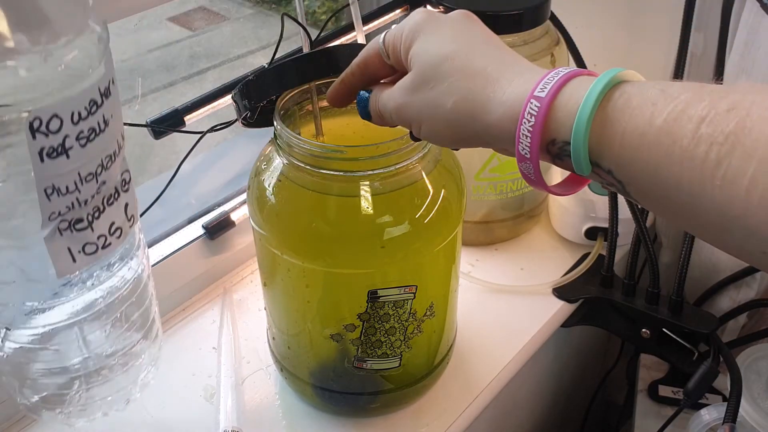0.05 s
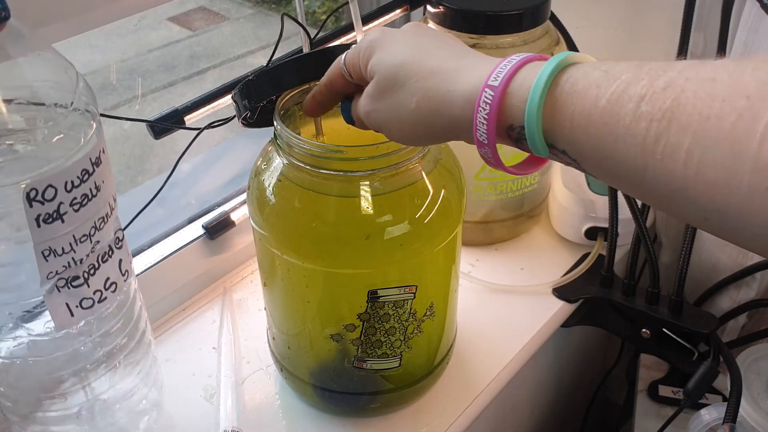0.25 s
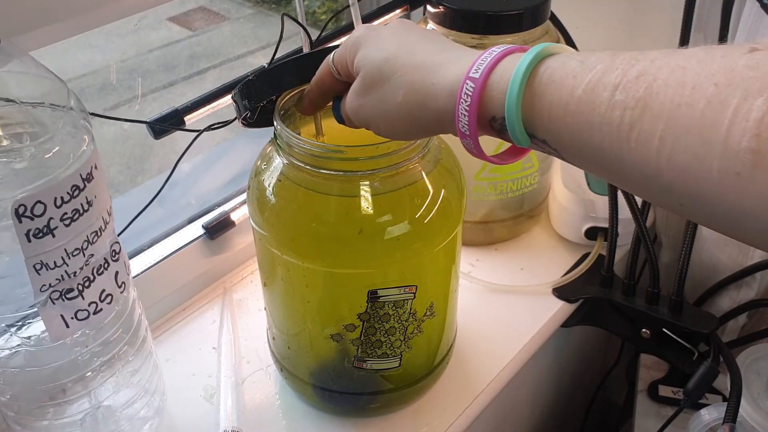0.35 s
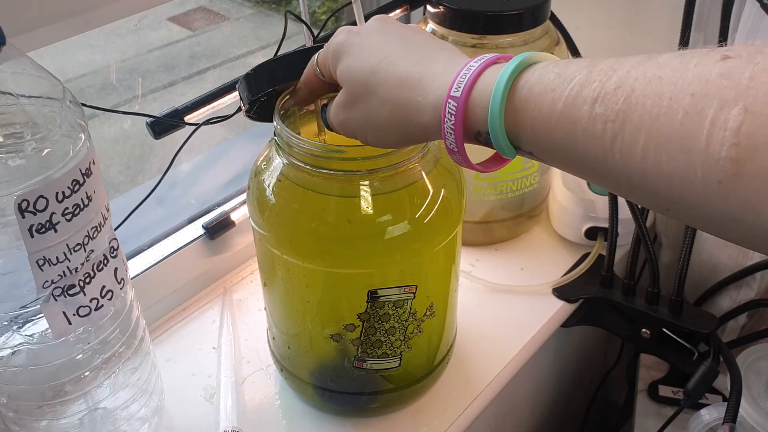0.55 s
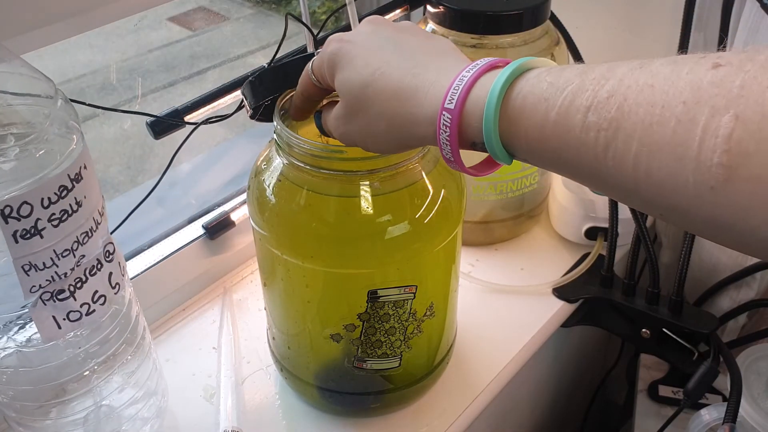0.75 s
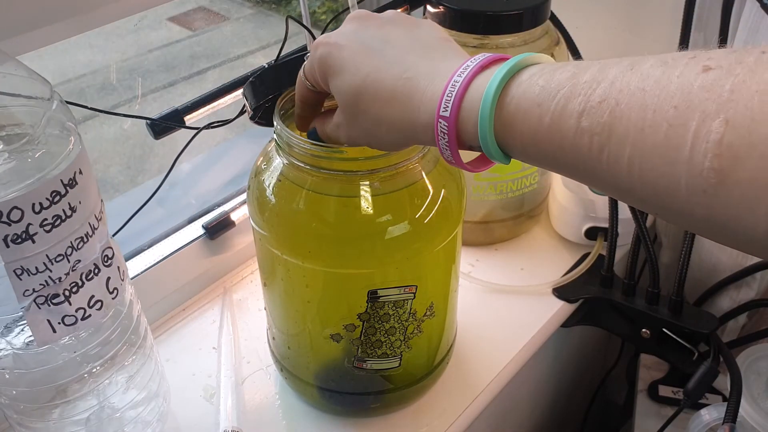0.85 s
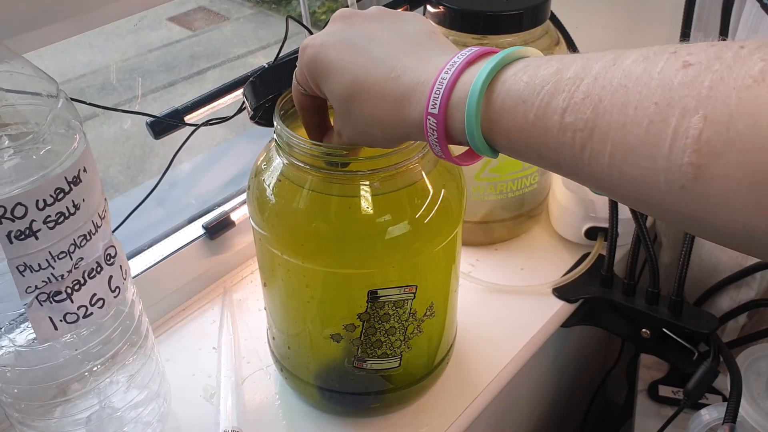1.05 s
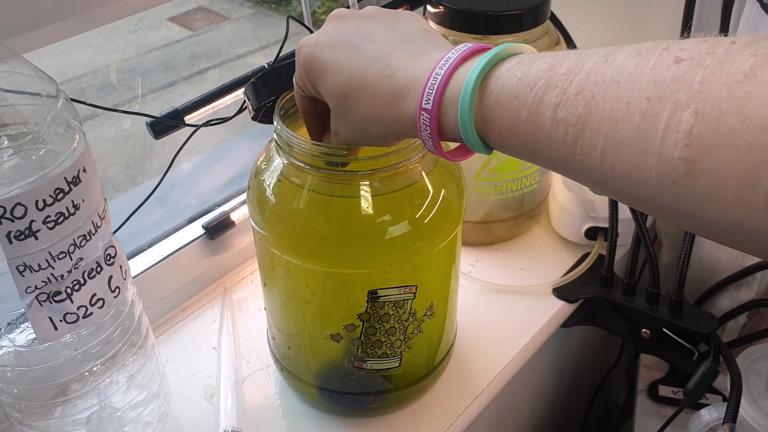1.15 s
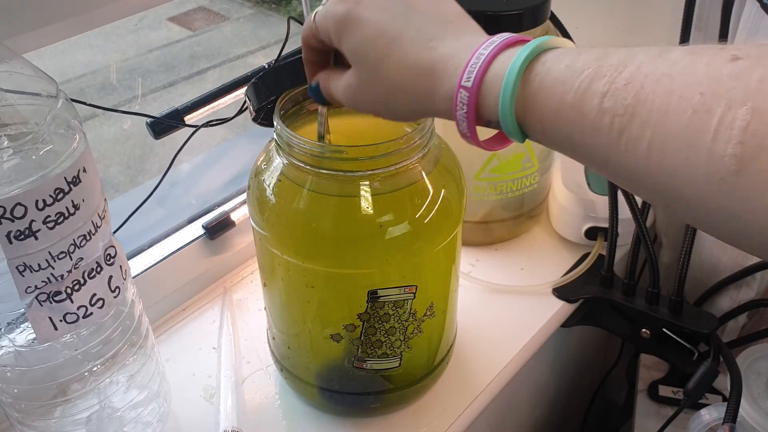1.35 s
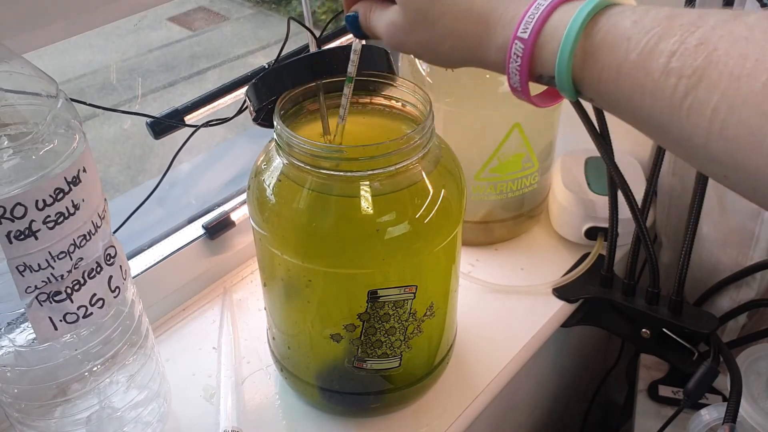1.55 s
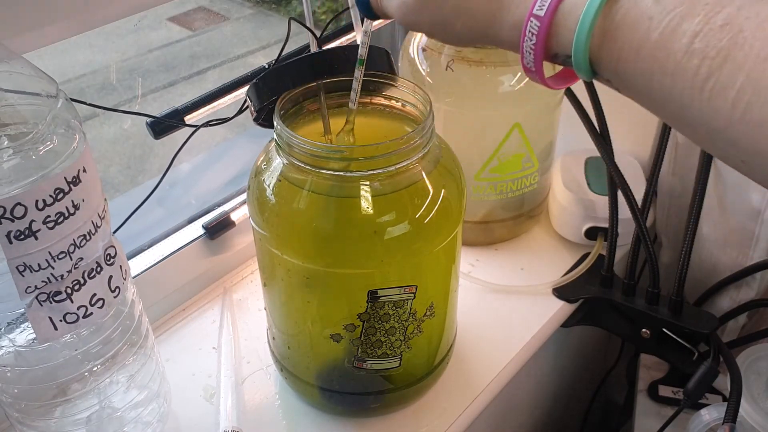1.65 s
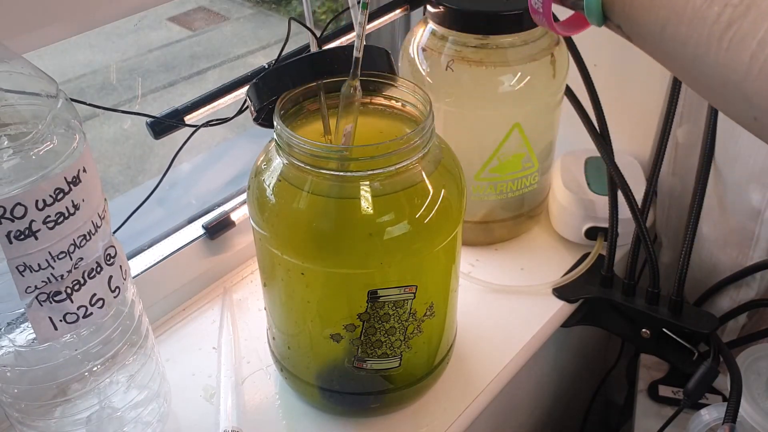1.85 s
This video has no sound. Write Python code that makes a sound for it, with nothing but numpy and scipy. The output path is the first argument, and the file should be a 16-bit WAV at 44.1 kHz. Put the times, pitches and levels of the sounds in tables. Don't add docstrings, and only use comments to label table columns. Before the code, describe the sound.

An empty plastic bottle crackles in the hand and knocks hollowly twice onto a window sill.

```python
import sys
import numpy as np
from scipy import signal
from scipy.fft import rfft, irfft
from scipy.io import wavfile

SR = 44100
rng = np.random.default_rng(int(sys.argv[2]) if len(sys.argv) > 2 else 0)


def ratio_of_db(decibels):
    return 10 ** (np.asarray(decibels, float) / 20)


def dump(signal):
    limited = np.clip(np.atleast_2d(signal).T, -1, 1)
    pcm = np.round(limited * 32767).astype(np.int16)
    wavfile.write(sys.argv[1], SR, pcm)


N = 83790


def level(x, db):
    return x * ratio_of_db(db) / np.sqrt(np.mean(x ** 2))


def curve(rows):
    return ratio_of_db(np.interp(np.arange(N) / SR, *np.array(rows).T[:2]))


def band(x, hz, width_hz):
    hz = min(hz, SR / 2.3)
    return signal.lfilter(*signal.iirpeak(hz, hz / min(width_hz, SR / 4), fs=SR), x)


def butter(x, order, hz, kind):
    return signal.sosfilt(signal.butter(order, hz, kind, fs=SR, output="sos"), x)


def fade(t60, count):
    return np.exp(-np.log(1000) * np.arange(count) / SR / t60)


def add(out, s, x):
    i = int(s * SR)
    out[i:i + len(x)] += x[:N - i]


def snaps(rows, wall, turns, tilt_db):
    out = np.zeros(N)
    for s, db, hz, t60, treble_db in rows:
        a, b, c = rng.standard_normal((3, 8192))
        grit = ratio_of_db(1.5 * np.repeat(c[:256], 32)) + ratio_of_db(1) * fade(0.005, 8192)
        burst = grit * fade(t60, 8192)
        ring = band(band(a * burst, hz, hz / turns), hz, 3.3 * hz)
        spray = np.zeros(8192)
        for (f, width, peak_db), chance in zip(wall, c[300:]):
            gain = ratio_of_db(peak_db + 1.5 * chance + tilt_db * np.log2(f)) / np.sqrt(width)
            spray += gain * band(band(b * burst, f, width), f, 3 * width)
        ring = ring / np.abs(ring).max()
        spray = spray / np.abs(spray).max()
        add(out, s, ratio_of_db(db) * (ring + ratio_of_db(treble_db) * spray))
    return out


def strike(modes, db, contact_ms, high_db=0., low_db=0.):
    t = np.arange(16384) / SR
    hz, mode_db, t60 = np.array(modes).T
    gain_chance, pitch_chance = rng.standard_normal((2, len(hz)))
    gain = ratio_of_db(mode_db + np.where(hz > 200, high_db, low_db) + 2.1 * gain_chance)
    gain = gain * (-1) ** np.arange(len(hz))
    lead = np.where(hz > 200, 0, np.pi / 2)[:, None]
    phase = 2 * np.pi * np.outer(hz * (1 + 0.0098 * pitch_chance), t) + lead
    bloom_ms = 1.8
    bloom = 1 - np.outer(np.where(hz > 300, .2, .9), np.exp(-t * 1000 / bloom_ms))
    ring = gain @ (np.sin(phase) * np.exp(-np.log(1000) * t / t60[:, None]) * bloom)
    push = t[:400] * np.exp(-t[:400] * 5000 / contact_ms)
    return ratio_of_db(db) * np.convolve(ring, push / push.sum())


def strikes(modes, rows):
    out = np.zeros(N)
    for s, *blow in rows:
        add(out, s, strike(modes, *blow))
    return out


def bottle_crackles():
    # start in seconds, level in dB, centre in Hz, t60 in seconds, treble in dB.
    crackles = [(.004, -35.5, 1320, 0.036, -14), (.013, -52, 2200, 0.58, -9.5), (.057, -46, 1230, 0.09, -9),
                (.0648, -33.5, 1460, 0.049, -6), (.072, -43.5, 2200, 0.044, -5),
                (.100, -52, 1170, 0.2, 1.5), (.1331, -41, 1240, 0.098, -7.5), (.1471, -44, 1150, 0.12, 2.5),
                (.188, -41, 1400, 0.24, -6.5), (.2106, -32, 1410, 0.04, -5),
                (.2110, -31.5, 2560, 0.022, -9), (.226, -31, 1150, 0.038, -8),
                (.2295, -45, 950, 0.063, 6.5), (.2593, -44, 4100, 0.11, 2), (.284, -34.5, 1120, 0.15, -6.5),
                (.3206, -32.5, 1410, 0.068, -7.5), (.345, -52.5, 1100, 0.39, -2.5),
                (.365, -52, 2270, 0.2, -2.5), (.40, -63.5, 2200, 0.22, 1), (.448, -59, 1150, 0.21, -3.5),
                (.618, -64, 1480, 0.088, -38), (.653, -57.5, 1850, 0.06, -34), (.779, -54, 2300, 0.18, 1),
                (.7861, -49.5, 2160, 0.057, 5), (.826, -69, 2330, 0.47, 11.5), (.8725, -48, 3500, 0.04, 11),
                (.9547, -56.5, 2500, 0.066, 4.5), (1.6157, -60.5, 2200, 0.16, -3.5)]
    # frequency in Hz, width in Hz, level in dB.
    wall_peaks = [(2310, 410, 1), (3500, 260, 2), (4800, 1420, 7), (6230, 2000, 6.5), (6500, 2200, -6.5),
                  (7500, 2000, -10.5), (9260, 2000, -4.5), (10530, 2300, 0.5), (13700, 1600, -11)]
    return snaps(crackles, wall_peaks, turns=2.6, tilt_db=-2.0)


def bottle_knocks():
    # frequency in Hz, level in dB, t60 in seconds.
    body = [(96, -3.5, 0.19), (130, -12.5, 0.14), (153.2, -12.5, 0.15), (267, -3.5, 0.19),
            (460, -22, 0.048), (602.5, -16, 0.15), (683, -12.5, 0.075), (936, -11, 0.039),
            (1150, -17.5, 0.1), (1410, -15, 0.06), (1544, -15, 0.09), (392, -11, 0.035)]
    # start in seconds, level in dB, contact in ms, upper modes in dB, lowest modes in dB.
    knocks = [
        (.2250, -22, 0.5, -4.5, 3),
        (.3200, -19, 1.17, 1, 4),
        (.432, -42, 3.6, 6, -18),
        (0.7866, -37, 0.68, 2, -33),
        (.806, -37.5, 5.1, 9.5, 6),
        (0.8719, -43.5, 0.23, -1, 2),
        (0.891, -53, 8.7, -6, 11.5),
        (0.9557, -47, 0.82, -3.5, 3),
        (1.015, -55, 1.8, -2.5, 8),
    ]
    return strikes(body, knocks)


def sill_bends():
    # start in seconds, level in dB.
    sweeps = [
        (0.2253, -23),
        (0.3205, -21),
        (0.7875, -43.5),
        (0.8722, -43.5),
    ]
    turns_per_root_s, peak_ms = 20.95, 3.28
    out, t = np.zeros(N), np.arange(2048) / SR
    x = t * 1000 / peak_ms
    swell = np.sqrt(x) * np.exp((1 - x ** 2) / 4)
    for s, db in sweeps:
        add(out, s, ratio_of_db(db) * swell * np.cos(2 * np.pi * turns_per_root_s * np.sqrt(t)))
    return out


def rim_clacks():
    # frequency in Hz, level in dB, t60 in seconds.
    near_rim = [(1170, -2.5, 0.057), (2000, -12, 0.068), (2270, 2, 0.061), (2450, -3.5, 0.057),
                (5570, -2, 0.029), (5670, -3, 0.029), (6130, 5, 0.022), (7050, -0.5, 0.042),
                (7350, -10, 0.023)]
    far_rim = [(2183, -17, 0.09), (2960, -13, 0.028), (3560, 0.5, 0.018), (4140, -8, 0.038),
               (5610, -1, 0.02), (6140, -2, 0.013), (6886, 4, 0.015), (7720, -6, 0.023)]
    # start in seconds, level in dB, contact in ms.
    near_hits = [
        (.7862, -48, 0.045),
        (.7935, -55.5, 0.12),
        (.9548, -66.5, 0.036),
    ]
    far_hits = [
        (0.8717, -45, 0.027),
        (0.8754, -56, 0.045),
    ]
    return strikes(near_rim, near_hits) + strikes(far_rim, far_hits)


def dent_pops():
    # frequency in Hz, level in dB, t60 in seconds.
    hum_modes = [(577, 0, 0.14)]
    ping_modes = [(1900, 2, 0.13), (1900, -17, 0.032)]
    # start in seconds, level in dB, contact in ms.
    hum_hits = [
        (.06, -37, 1.36),
    ]
    ping_hits = [
        (0.2603, -42.5, 0.12),
    ]
    return strikes(hum_modes, hum_hits) + strikes(ping_modes, ping_hits)


def jar_taps():
    # frequency in Hz, level in dB, t60 in seconds.
    jar_modes = [(315.5, 0, 0.075), (398, -13.5, 0.091), (429.5, 1.5, 0.087), (548, -1.5, 0.041),
                 (610, -7.5, 0.08), (806, -19.5, 0.088), (1123, -10, 0.063), (1320, -20, 0.034)]
    # start in seconds, level in dB, contact in ms.
    taps = [
        (.6185, -43.5, 0.37),
        (.636, -45, 0.96),
        (.6535, -36.5, 0.13),
        (.668, -45, 0.86),
        (.716, -75, 0.69),
    ]
    return strikes(jar_modes, taps)


def jar_rub():
    # time in seconds, level in dB.
    effort = [
        (1.05, -85.5),
        (1.12, -80.5),
        (1.26, -84),
        (1.296, -77),
        (1.305, -59.5),
        (1.330, -54),
        (1.345, -68),
        (1.385, -70.5),
        (1.44, -81),
        (1.5, -102),
    ]
    # frequency in Hz, width in Hz, level in dB.
    jar_peaks = [(1093, 340, 3), (1293, 100, -11.5), (2200, 400, 0.5), (5100, 1200, -3.5),
                 (6280, 790, -2.5), (7300, 780, -4.5), (10900, 4600, -2.5)]
    slips = rng.standard_normal(N) * ratio_of_db(2.65 * rng.exponential(size=N))
    rubbed = np.zeros(N)
    for f, width, db in jar_peaks:
        peak = band(band(band(slips, f, 1.24 * width), f, width), f, 3 * width)
        rubbed += ratio_of_db(db) * level(peak, 0)
    return curve(effort) * level(rubbed, 0)


def tube_ticks():
    # start in seconds, level in dB, centre in Hz, t60 in seconds, treble in dB.
    ticks = [(1.439, -70, 3300, .01, -15), (1.457, -62, 7200, 0.02, -20), (1.462, -79, 3300, .01, -23),
             (1.468, -76, 7150, 0.057, -20), (1.4975, -54.5, 7200, 0.021, 8.5),
             (1.501, -67, 3540, 0.0055, 6), (1.5638, -62.5, 9200, 0.0062, -14),
             (1.6826, -63.5, 1070, 0.01, -1), (1.683, -65, 3460, .012, -15),
             (1.7035, -59.5, 3160, 0.017, 3.5), (1.7295, -55, 10000, 0.0054, -12),
             (1.735, -61, 7500, 0.01, 6), (1.753, -71, 7350, 0.012, 12), (1.772, -58, 12500, 0.01, -25),
             (1.8522, -71, 9000, 0.0079, -2), (1.846, -70, 10700, .008, -7),
             (1.8585, -65, 11100, 0.0072, -3), (1.857, -68.5, 1180, 0.19, -6),
             (1.8816, -62, 7500, 0.0082, 5), (1.897, -66, 7200, 0.016, -12)]
    sprays = [
        (.779, -62, 12600, 0.17, -3),
        (0.786, -42.5, 12500, 0.064, -2.5),
        (.826, -59, 12400, 0.24, 1),
        (0.8732, -42.5, 10900, 0.051, -5),
        (.9550, -60, 11300, 0.033, -0.5),
    ]
    # frequency in Hz, width in Hz, level in dB.
    tube_peaks = [(2300, 610, -9.5), (3300, 1000, -6.5), (5200, 1300, -28), (7200, 790, -1.5),
                  (9530, 1200, -3.5), (11000, 1900, 1.5), (14400, 5800, -5)]
    return snaps(ticks + sprays, tube_peaks, turns=4.4, tilt_db=1.3)


def gurgle():
    # time in seconds, level in dB.
    flow = [(0, -55), (.2, -52.5), (.45, -55), (.52, -69.5), (.59, -82), (.7, -62), (.77, -68), (.9, -59),
            (1.03, -65.5), (1.2, -63), (1.3, -57), (1.38, -56.5), (1.43, -66), (1.56, -69), (1.63, -66.5),
            (1.75, -71.5), (1.81, -119), (1.9, -89)]
    out, t = np.zeros(N), np.arange(2048) / SR
    count = int(600 * N / SR)
    starts = rng.uniform(0, N / SR, count)
    for s, size, force in zip(starts, rng.standard_normal(count), rng.exponential(size=count)):
        centre_hz = np.interp(s, [.4, .9], (415, 372.5))
        spread = np.interp(s, [.4, .9], (0.304, 0.18))
        hz = centre_hz * np.exp(spread * size)
        x = t * hz / 5.45
        add(out, s, ratio_of_db(2.38 * force) * x ** 2 * np.exp(-6. * x) * np.sin(2 * np.pi * hz * t))
    return level(out, 0) * curve(flow)


def thumps():
    # start in seconds, level in dB, frequency in Hz, length in seconds.
    swells = [(0.059, -55, 87, 0.033), (0.128, -54.5, 113, 0.053), (0.438, -53.5, 57.7, 0.062),
              (0.628, -55.5, 62, 0.089), (0.832, -56, 55.6, 0.093), (0.967, -61, 69.3, 0.092),
              (1.07, -60, 101.7, 0.069), (1.294, -59.5, 54, 0.047), (1.38, -55, 71, 0.084),
              (1.585, -71, 58, 0.029), (1.691, -58, 62.2, 0.079), (1.822, -56.5, 62, 0.1)]
    rumble_hz, width_hz = 61, 55
    out = level(band(band(rng.standard_normal(N), rumble_hz, width_hz), rumble_hz, 2 * width_hz), -66.5)
    for s, db, hz, length in swells:
        t = np.arange(int(length * SR)) / SR
        add(out, s, ratio_of_db(db) * np.sin(np.pi * t / length) * np.sin(2 * np.pi * hz * t))
    return out


def hiss():
    # frequency in Hz, level in dB per Hz.
    colour = [(70, 13.5), (330, 9), (1000, 1.5), (5000, -10), (7000, -10.5), (8600, -14), (12800, -5),
              (16000, -8)]
    f = np.maximum(np.fft.rfftfreq(N, 1 / SR), 1)
    hz, db = np.array(colour).T
    mid, side = rfft(rng.standard_normal((2, N))) * ratio_of_db(np.interp(np.log(f), np.log(hz), db))
    scale = ratio_of_db(-77) / np.sqrt(np.mean(irfft(mid * (f > 600), N) ** 2))
    side = side * np.clip(f / 700, .25, 1)
    return scale * irfft(np.array([mid + side, mid - side]), N)


def room(near_hz, sides):
    near = rng.standard_normal(16384) * fade(0.0039, 16384)
    tail = rng.standard_normal((2, 16384)) * fade(0.21, 16384)
    near = butter(near / np.sqrt(np.sum(near ** 2)), 4, near_hz, "high")
    tail = butter(tail / np.sqrt(np.sum(tail[0] ** 2)), 3, [380, 7500], "band")
    echo = ratio_of_db(-13.5) * near * sides + ratio_of_db(-6) * tail
    echo[:, 0] += 1
    return echo


def crisp():
    return bottle_crackles() + tube_ticks() + rim_clacks() + jar_rub()


def scene():
    near_hz = 444
    sides = np.array([[1], [-1]])
    blows = bottle_knocks() + jar_taps() + dent_pops()
    knocks = butter(blows, 2, 70, "high") + sill_bends()
    water = gurgle() + thumps()
    dry = knocks + crisp() + water
    upper_cut = signal.butter(3, 400, "high", fs=SR, output="sos")
    upper = signal.hilbert(signal.sosfiltfilt(upper_cut, knocks))
    difference = crisp() + 0.11 * water + ratio_of_db(-4.5) * upper.imag - 0.29 * upper.real
    heard = signal.fftconvolve(dry[None], room(near_hz, sides), axes=1)[:, :N]
    heard = heard + difference * sides + hiss()
    low = signal.sosfiltfilt(signal.butter(2, near_hz, fs=SR, output="sos"), heard)
    bass_pan_db, treble_pan_db = 5, 3
    return low * ratio_of_db(sides * bass_pan_db / 2) + (heard - low) * ratio_of_db(sides * treble_pan_db / 2)


def roll_off(x):
    return signal.sosfilt(signal.butter(12, 16510, fs=SR, output="sos"), x)


def record(dry):
    top_cut = signal.ellip(8, .2, 70, 15800, fs=SR, output="sos")
    return roll_off(signal.sosfilt(top_cut, dry))


dry = scene()
out = record(dry)
dump(out)
```